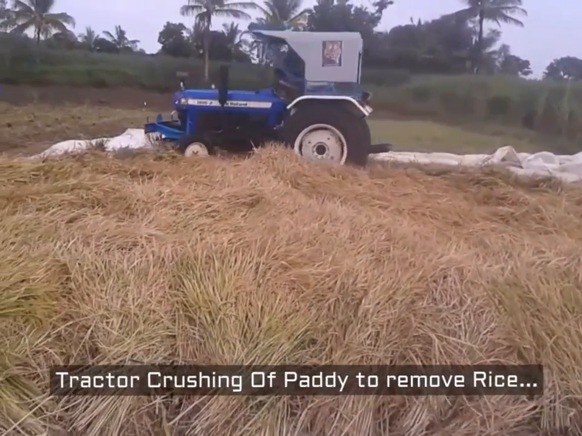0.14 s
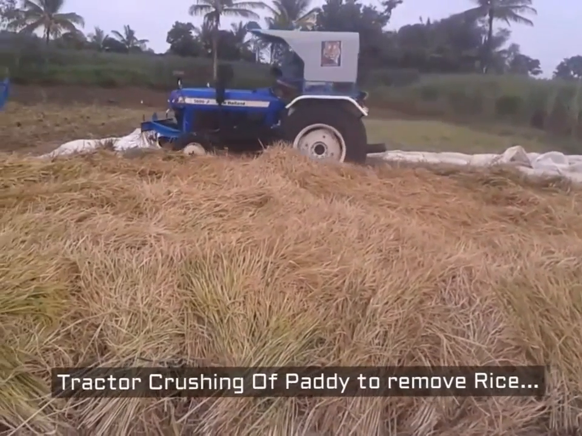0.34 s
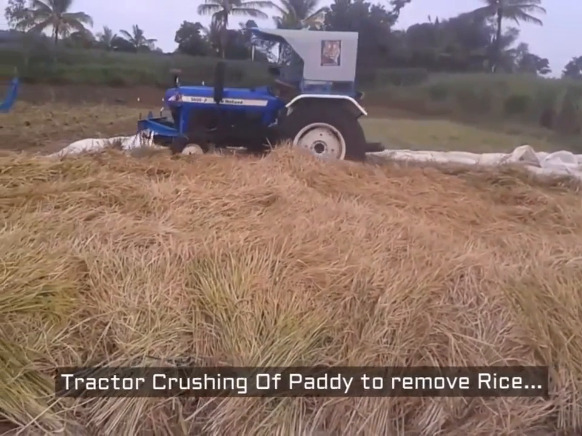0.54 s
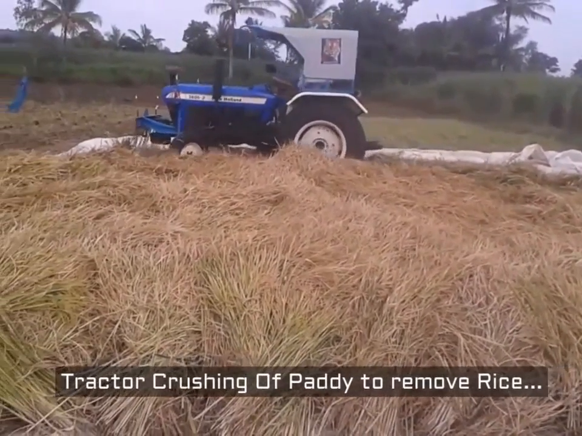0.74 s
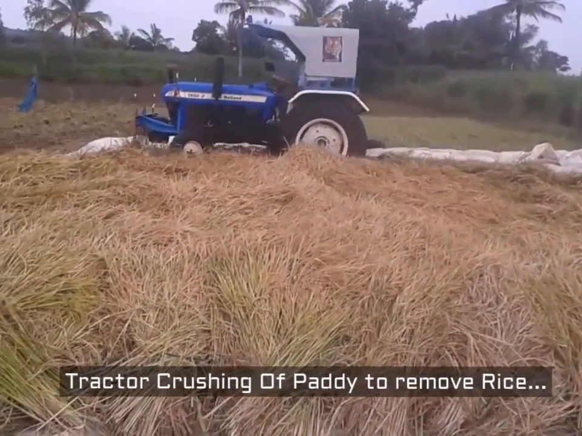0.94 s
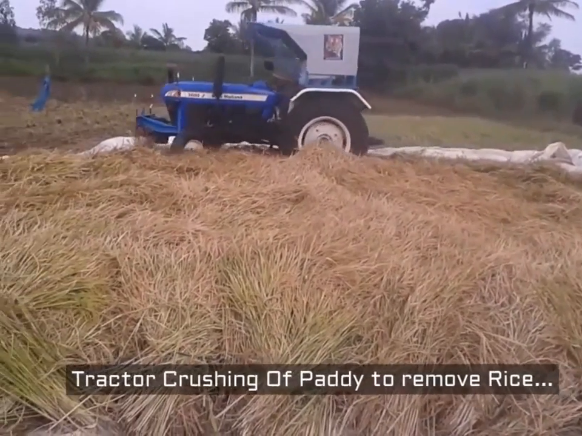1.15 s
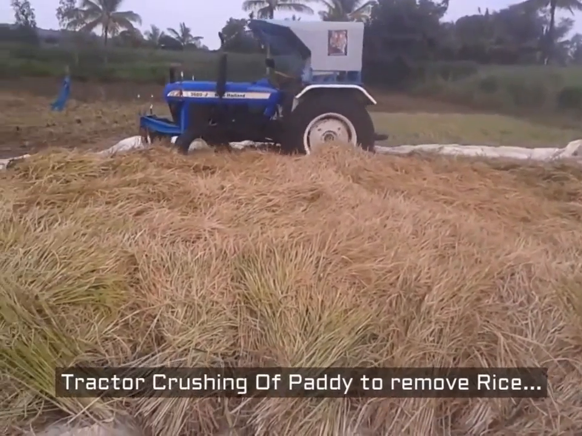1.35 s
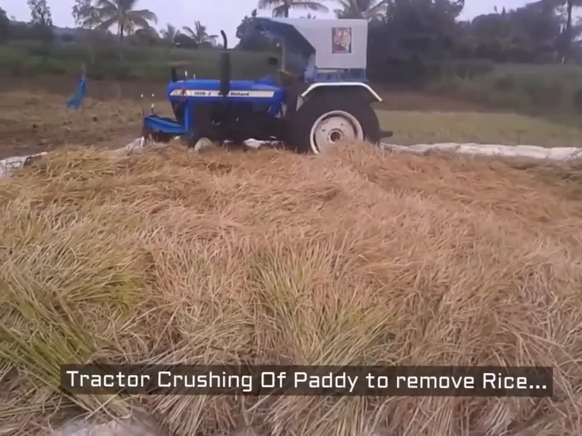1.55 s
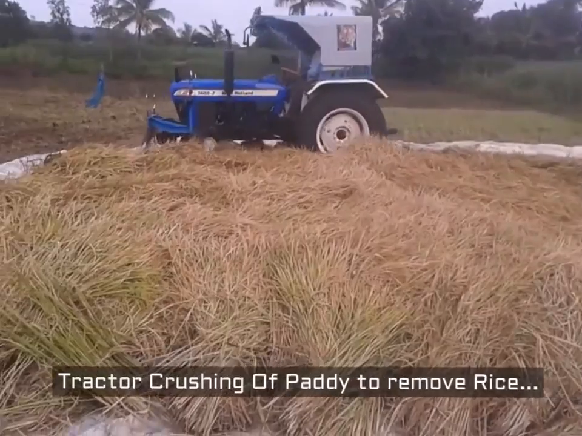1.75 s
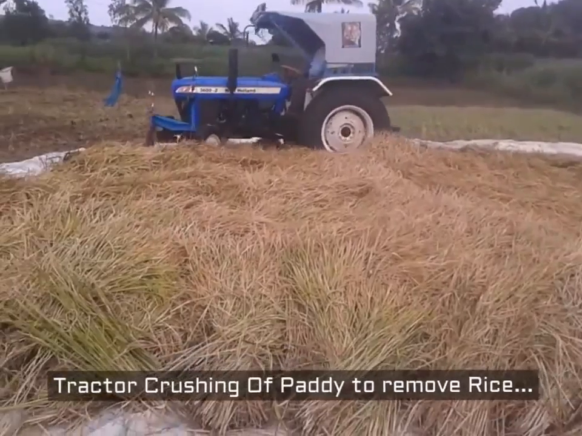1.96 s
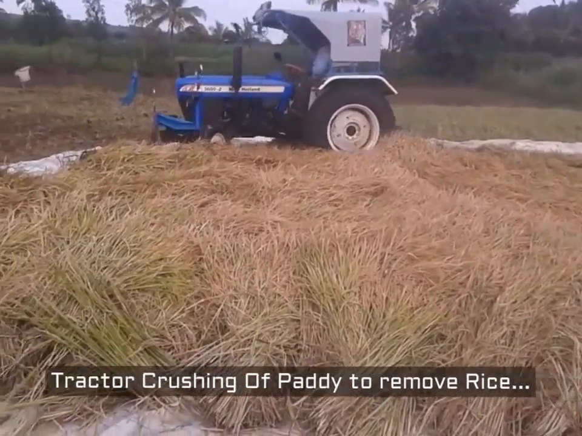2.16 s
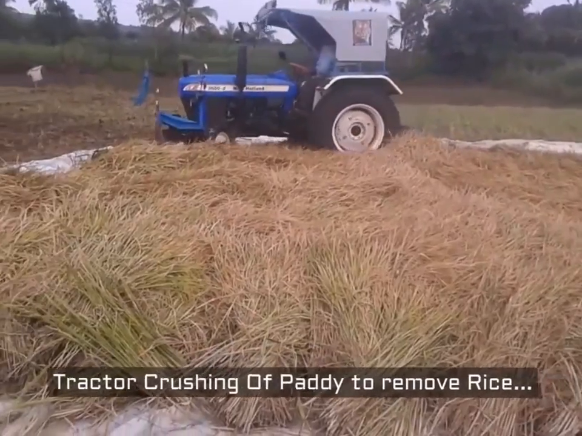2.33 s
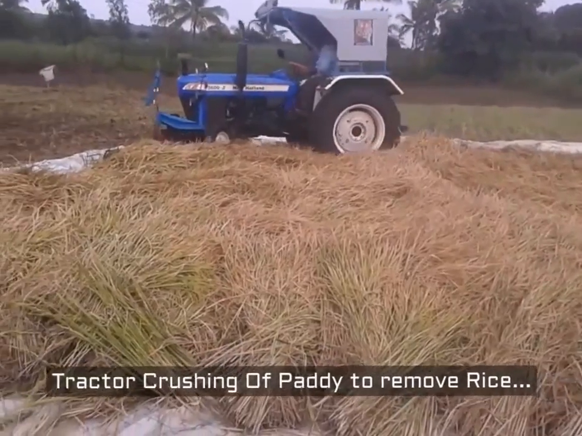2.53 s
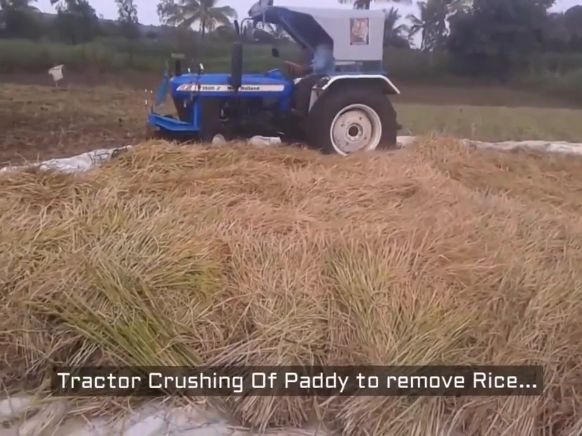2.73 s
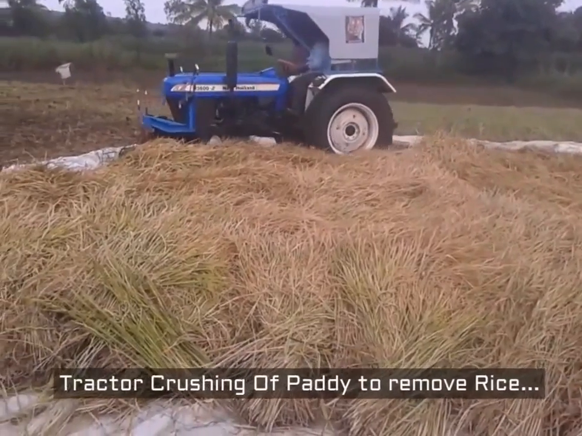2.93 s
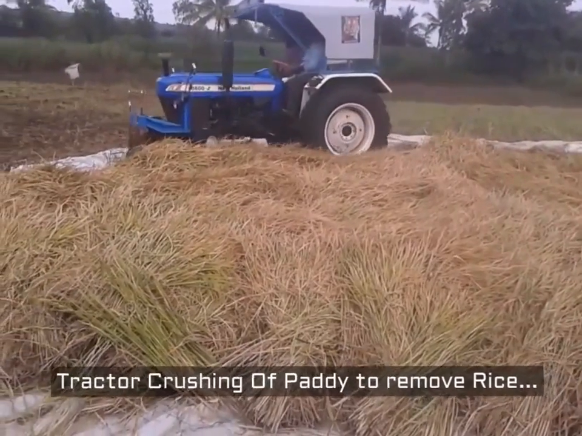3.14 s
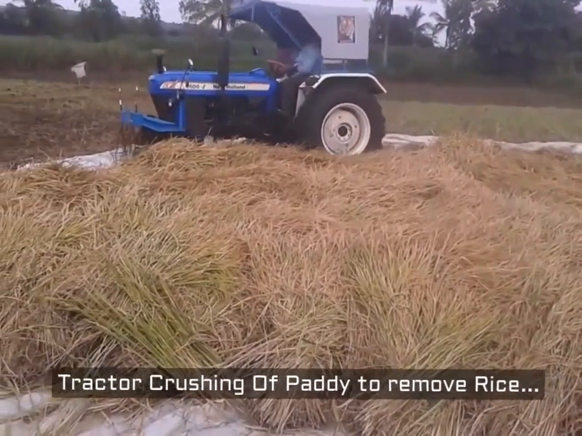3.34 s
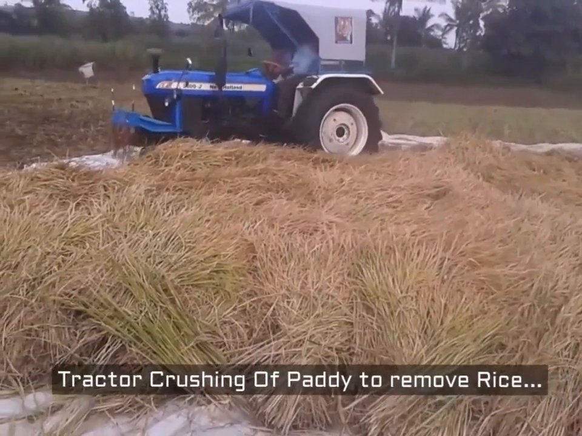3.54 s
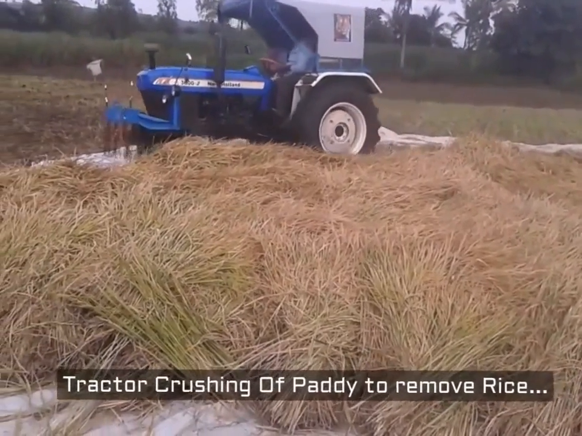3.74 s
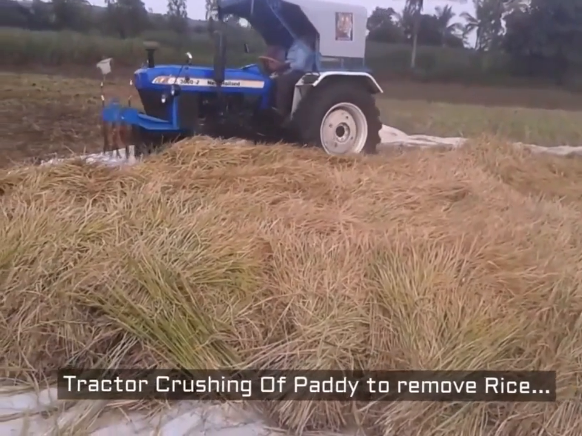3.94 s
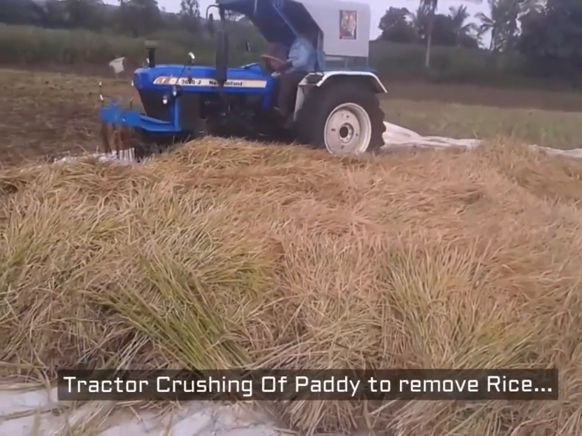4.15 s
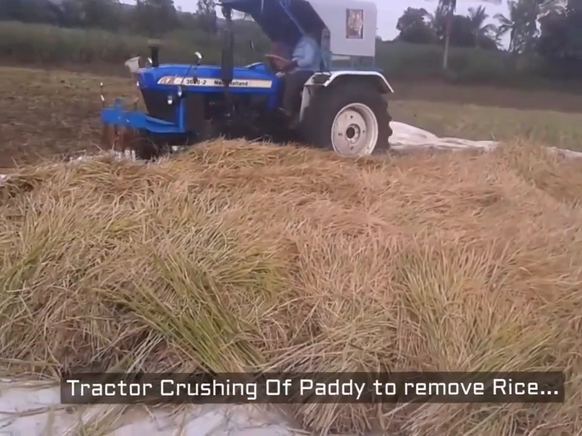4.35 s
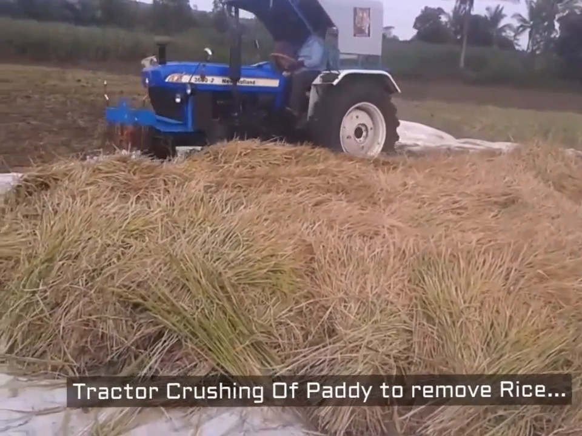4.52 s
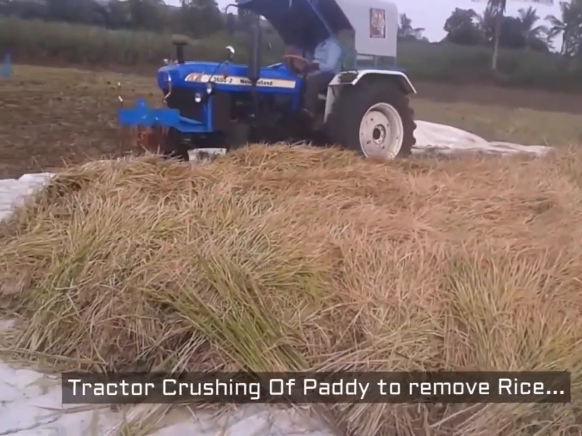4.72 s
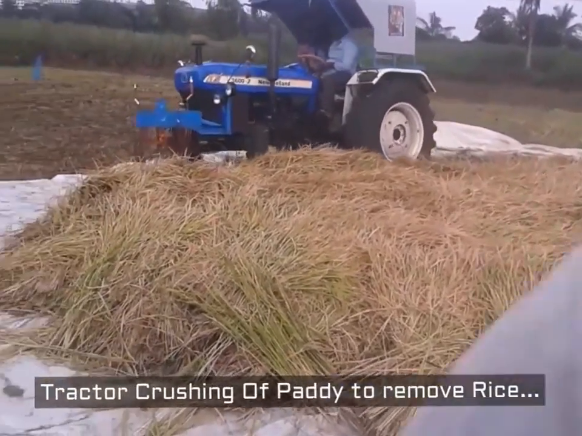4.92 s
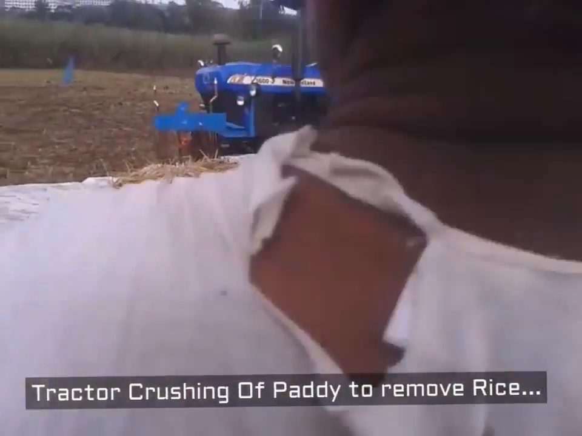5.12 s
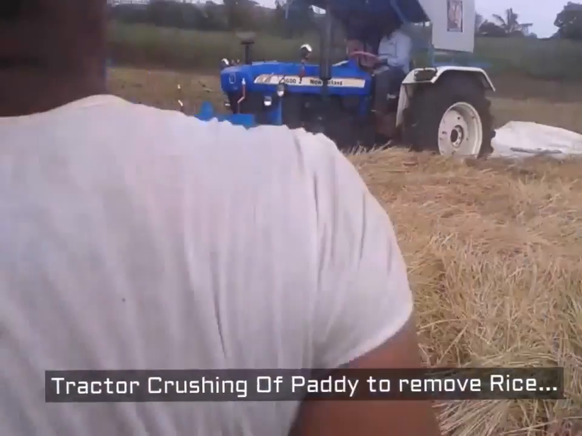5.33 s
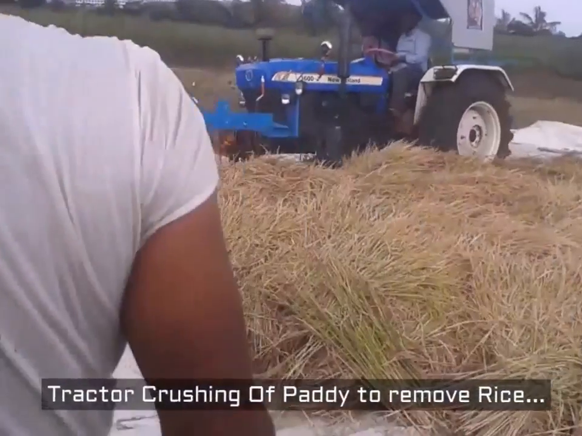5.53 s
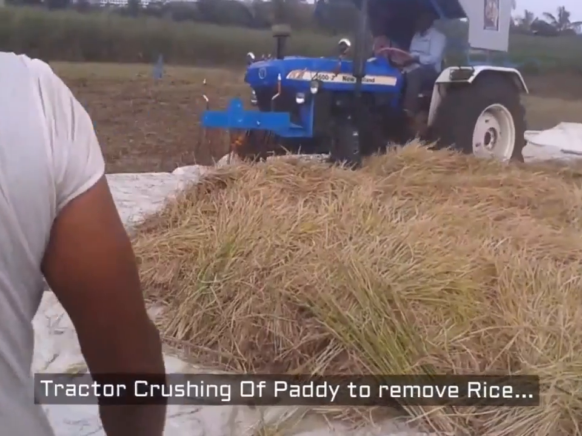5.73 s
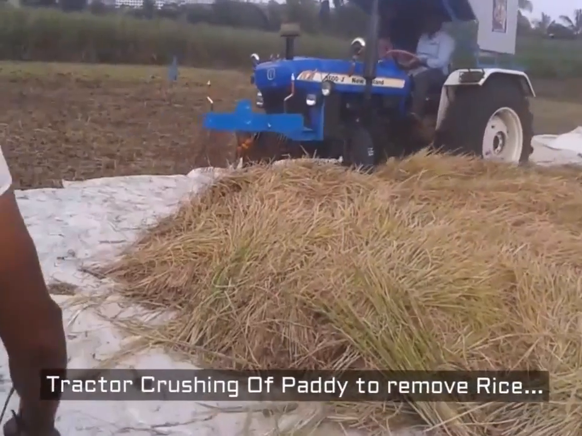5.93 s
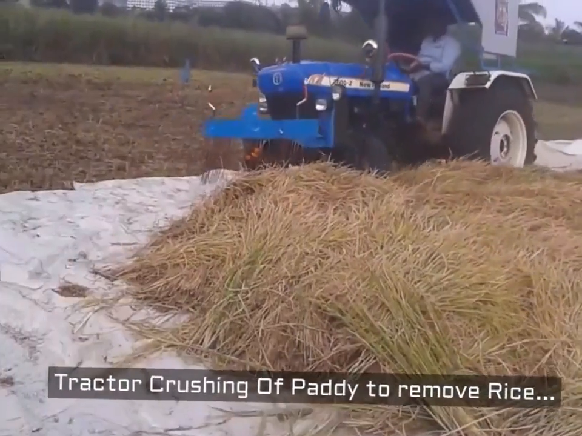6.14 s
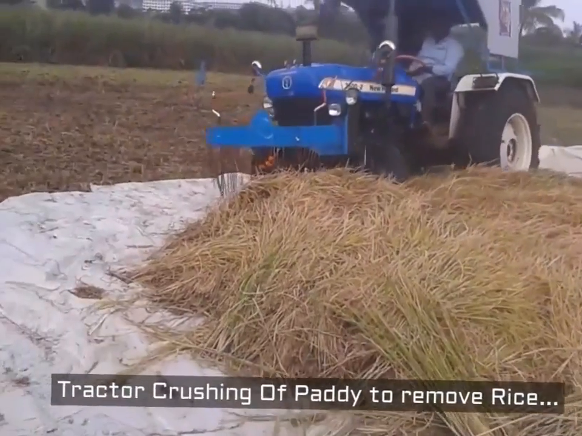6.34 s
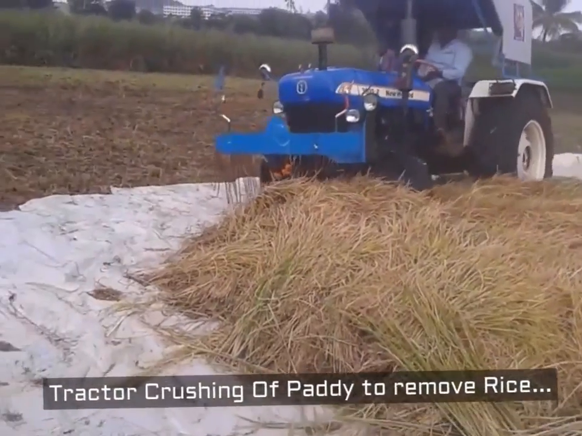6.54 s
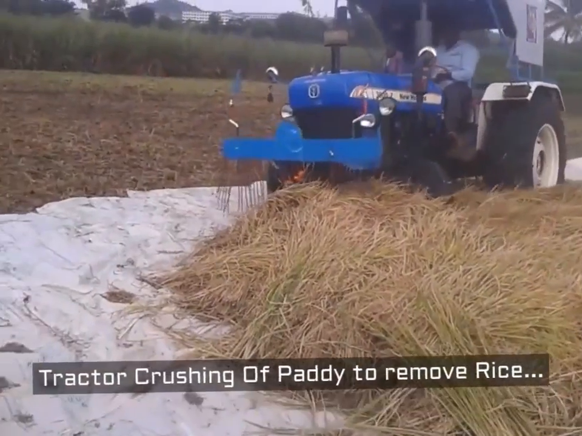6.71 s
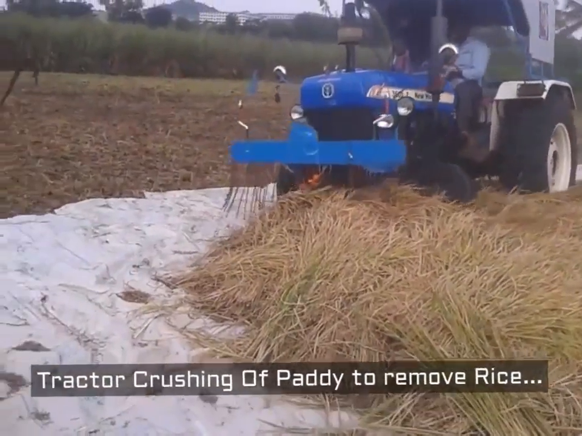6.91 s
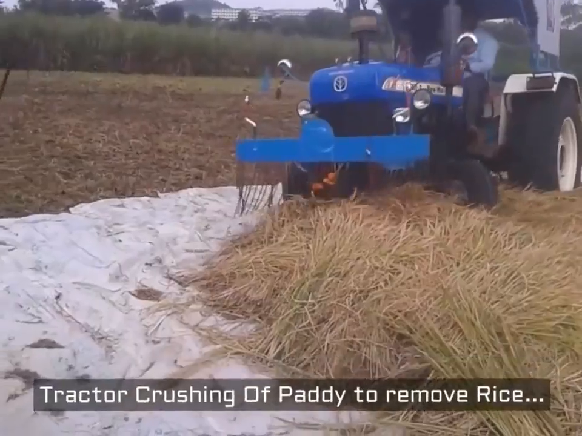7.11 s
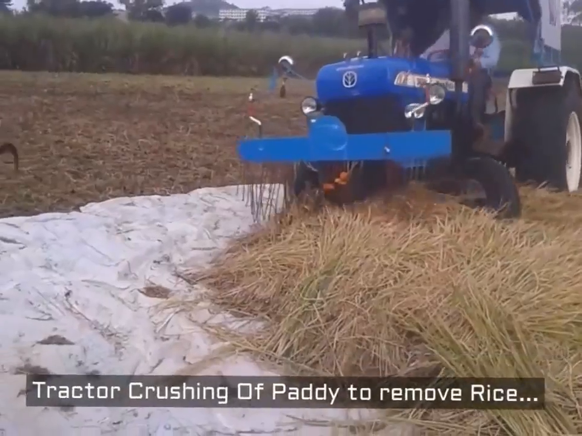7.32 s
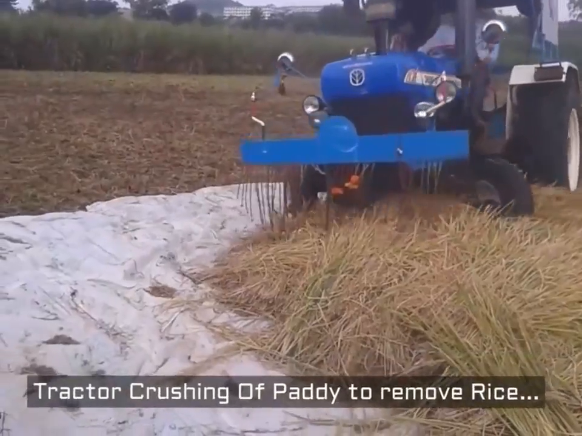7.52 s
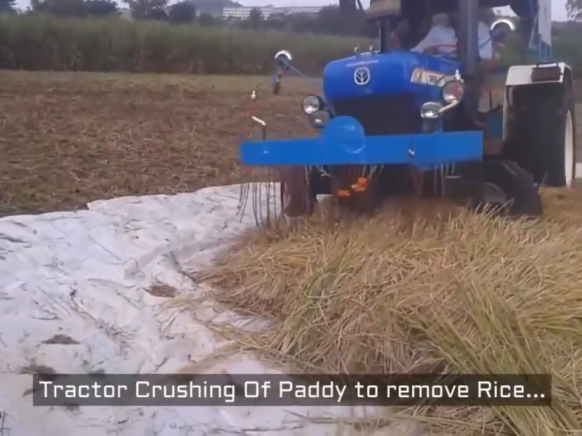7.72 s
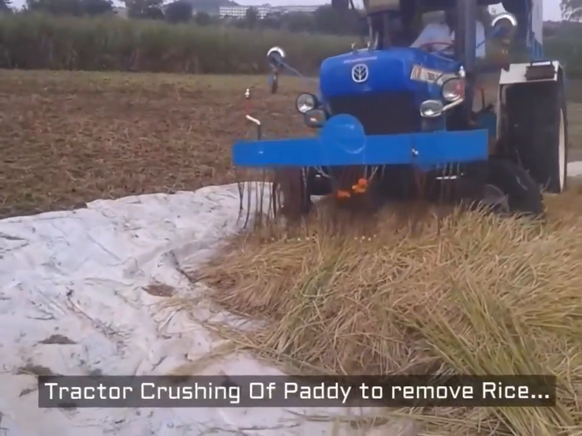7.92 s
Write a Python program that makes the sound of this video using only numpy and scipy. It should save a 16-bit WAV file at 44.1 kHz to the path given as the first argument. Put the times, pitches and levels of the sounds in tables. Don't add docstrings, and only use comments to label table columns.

```python
import sys
import numpy as np
from scipy import signal
from scipy.fft import rfft, irfft, next_fast_len
from scipy.io import wavfile
from scipy.ndimage import uniform_filter1d

SR = 44100
rng = np.random.default_rng(int(sys.argv[2]) if len(sys.argv) > 2 else 0)


def wav_record(signal):
    frames = np.transpose(np.atleast_2d(signal))
    bounded = np.clip(frames, -1, 1)
    quanta = np.round(bounded * 32767).astype(np.int16)
    wavfile.write(sys.argv[1], SR, quanta)


def undo_db(level):
    steps = np.asarray(level, float) / 20
    return 10 ** steps


N = 351477


def rms_one(x):
    return x / np.sqrt(np.mean(x ** 2) + 1e-20)


def in_time(rows):
    s, *columns = np.transpose(rows)
    return [np.interp(np.arange(N) / SR, s, c) for c in columns]


def evened(x, span_s=0.3):
    return x / np.sqrt(uniform_filter1d(x ** 2, int(span_s * SR)) + 1e-12)


def coloured(x, spectrum):
    size = next_fast_len(N)
    hz, db = np.transpose(spectrum)
    grid = np.maximum(np.arange(size // 2 + 1) * SR / size, 1)
    gain = undo_db(np.interp(np.log(grid), np.log(hz), db))
    return rms_one(irfft(rfft(x, size) * gain, size)[:N])


def resonate(x, hz, width_hz):
    r = np.exp(-np.pi * width_hz / SR)
    top = (1 - r * r) / 2
    return signal.lfilter([top, 0, -top], [1, -2 * r * np.cos(2 * np.pi * hz / SR), r * r], x)


def band(x, low_hz, high_hz):
    return evened(signal.sosfilt(signal.butter(3, [low_hz, high_hz], "band", fs=SR, output="sos"), x))


def passing(events):
    t = np.arange(N) / SR
    return sum(db * np.exp(-((t - s) / half_s) ** 2) for s, db, half_s in events)


def rattle(spread_db, size=N):
    return rms_one(rng.standard_normal(size) * undo_db(spread_db * np.minimum(rng.exponential(1, size), 4)))


def stroke(firings, start, rise, hold, fall):
    since = (firings - start) % 1
    shape = np.clip(since / rise, 0, 1) * np.exp(-np.maximum(since - hold, 0) / fall)
    return shape, np.floor(firings - start).astype(int) + 3


def contacts(number, habit, grain_db, change_s=1.08):
    began = np.maximum.accumulate(np.arange(N) * (np.diff(number, prepend=0) > 0))
    trains = rattle(grain_db, size=12 * 3 * 4000).reshape(12, 3, 4000)
    age = began / SR / change_s
    older, since = age.astype(int), np.arange(N) - began
    blend = age % 1 * np.pi / 2
    train = np.cos(blend) * trains[older, number % 3, since]
    train = train + np.sin(blend) * trains[older + 1, number % 3, since]
    return np.sqrt(habit) * train + np.sqrt(1 - habit) * rattle(grain_db)


def strikes(number, delays_s, loose_s):
    starts = np.flatnonzero(np.diff(number) > 0)
    late = np.array(delays_s) + loose_s * rng.random((200, len(delays_s)))[:len(starts)]
    out = np.zeros(N + 2000)
    out[starts[:, None] + (np.abs(late) * SR).astype(int)] = (-1.) ** np.arange(len(delays_s))
    return out[:N]


# (frequency [Hz], density [dB per Hz])
ROAR_SPECTRUM = [(320, -28.5), (550, -8), (666, -3.5), (1130, 2), (1590, -2), (1990, -2.5), (2080, 4.5),
                 (2340, -42), (3220, -7), (4290, -13), (5140, -6), (7000, -21), (9100, -73), (15400, -120)]


def roar(level_db):
    return undo_db(level_db - 4.5) * coloured(rng.standard_normal(N), ROAR_SPECTRUM)


# (frequency [Hz], density [dB per Hz])
HISS_SPECTRUM = [(3060, -21.5), (5200, -3.5), (6600, -6), (7890, -9.5), (15600, -19.5)]
# (time [s], gain [dB], half-length [s])
SWISHES = [
    (.2, 5.5, 0.12),
    (1.55, 2, 0.16),
    (3.1, 1, 0.11),
    (4.35, 11.5, 0.063),
    (5.61, 4, 0.027),
    (5.71, 11.5, 0.068),
    (7.35, 6, 0.54),
]


def straw():
    t = np.arange(N) / SR
    clumps_db = np.interp(t * 14, np.arange(120), 2.9 * rng.standard_normal(120))
    level_db = -40 + 0.8448 * t + passing(SWISHES)
    return undo_db(level_db - 0.5 + clumps_db) * coloured(rattle(spread_db=5.0), HISS_SPECTRUM)


def brush():
    hz, width_hz = 4400, 1800
    sweep = np.exp(-((np.arange(N) / SR - 5.67) / 0.12) ** 2)
    grains = resonate(resonate(rattle(spread_db=5.0), hz, width_hz), hz, 2 * width_hz)
    return undo_db(-21.5) * sweep * rms_one(grains)


# (time [s], speed [rpm])
SPEED = [(0, 785.1), (0.29, 830.4), (1.11, 699.8), (1.69, 767.4), (2.03, 877.1), (2.88, 805.9),
         (3.13, 844.4), (3.38, 921.3), (4.29, 798.9), (4.7, 872.7), (5.49, 823.2), (5.85, 880.0),
         (6.17, 858.8), (6.57, 911.2), (7.49, 777.5), (7.8, 792.9), (7.97, 774.5)]


def crank():
    firings_per_turn, first_firing = 1.5, .089
    return first_firing + np.cumsum(in_time(SPEED)[0]) * firings_per_turn / 60 / SR


# (time [s], gain [dB], held [s], harder knock [dB])
SURGES = [(.15, 3, 0.041, -5), (.6, 3.5, 0.09, -1.5), (1.398, 2.5, 0.033, 2.5), (1.78, 1.5, 0.24, -0.3),
          (2.29, 1, 0.3, -0.3), (2.56, -0.5, 0.36, 0.8), (2.959, 3.5, 0.24, 1.5), (3.57, 3.5, 0.047, -0.8),
          (3.85, 3.5, 0.13, -1), (4.21, 2, 0.19, 1.5), (4.6, 2, 0.28, 0.3), (5.07, 1, 0.033, 0.7),
          (5.41, 3, 0.26, .1), (5.63, 2, 0.15, 0.5), (5.86, 0.5, 0.3, 0), (6.24, 0.4, 0.079, -1.1),
          (7.0, 0.1, 0.4, 1.5)]


def surges():
    rise_s, fall_s = 0.01, 0.075
    s, db, held_s, hard_db = np.transpose(SURGES)[:, :, None]
    since = np.arange(0, N, 50) / SR - s
    shape = np.clip(since / rise_s, 0, 1) * np.exp(-np.clip(since - held_s, 0, None) / fall_s)
    return [np.repeat((c * shape).sum(0), 50)[:N] for c in (db, hard_db)]


# (time [s], difference of the cylinders [0-1.5], nose facing the microphone [0-1])
TURN = [(0, 1.1, 0.18), (.8, 0.84, 0.09), (1.55, 0.8, 0.23), (2.2, 0.14, 0.29), (3, 0.53, 0.27),
        (3.8, 0, 0.23), (4.6, 0.45, 0.68), (5.3, 0.43, 0.57), (5.8, 0.52, 0.47), (6.8, 0.9, 0.69),
        (7.3, 0.8, 0.78), (7.97, 1, 1.0)]


def struck(modes, shape, number, hits, habit, vary_db, mode_vary_db, grain_db, between_db):
    chance = rng.standard_normal((200, len(modes) + 1))
    shaking = contacts(number, habit, grain_db)
    unevenness, facing = in_time(TURN)
    out = np.zeros(N)
    for k, (hz, width_hz, nose_db, *by_cylinder) in enumerate(modes):
        mean_db = np.mean(by_cylinder)
        own_db = unevenness * (np.array(by_cylinder)[number % 3] - mean_db)
        strength = undo_db(own_db + vary_db * chance[number, -1] + mode_vary_db * chance[number, k])
        force = strength * (shape * shaking + hits) + undo_db(between_db) * shaking
        ring = resonate(force * undo_db(mean_db + nose_db * facing), hz, width_hz)
        out += (-1) ** k * ring / np.sqrt(width_hz)
    return out


# (frequency [Hz], width [Hz], gain nose-on [dB], cylinder 1, 2, 3 [dB])
PIPE = [(186, 30, -12.5, -18, -12.5, -18.5), (299.5, 55, 2, -10.5, -17.5, -3.5), (392, 50, 3, -6, -15, 2.5),
        (464, 63.5, -1.5, 1.5, 3.5, -4), (504, 52, 3, -4, -4.5, -4), (550.4, 39, 1, -2.5, -4.5, -9.5)]
# (frequency [Hz], density [dB per Hz])
THUMP_SPECTRUM = [(12, -69), (20, -30), (135, -17.5), (184, -11), (245, -41), (307, -0.5), (403, -0.5),
                  (445, 0.5), (600, -10), (780, -63), (1320, -120)]


def exhaust(firings, level_db):
    shape, number = stroke(firings, start=0.1003, rise=0.038, hold=0.1, fall=0.38)
    hits = undo_db(29) * strikes(number, [.003, .024], loose_s=.0002)
    puffs = struck(PIPE, shape, number, hits, habit=.9, vary_db=1.2, mode_vary_db=1.2,
                   grain_db=1.5, between_db=-1.5)
    beat, number = stroke(firings, start=0.85, rise=0.091, hold=0.79, fall=0.19)
    lump_db = np.clip(6 * rng.standard_normal(200), -14, 5)
    lumps = beat * undo_db(lump_db)[number // 2] + .05
    body = coloured(contacts(number, habit=0.65, grain_db=8.0) * lumps, THUMP_SPECTRUM)
    return undo_db(level_db - 2.2) * band(puffs, low_hz=167, high_hz=600) + undo_db(level_db - 7.0) * body


# (frequency [Hz], width [Hz], gain nose-on [dB], cylinder 1, 2, 3 [dB])
COVERS = [(839, 76, 10.5, -12, -13, -7), (928, 127, 7, 0, 1, -19), (1144, 95, -1.5, 8, -1.5, -3),
          (1265, 87, 6, 9, -7, -5.5), (1460, 157, 3.5, 2.5, -0.5, 2.5), (1750, 132, 1, 2, 1.5, 1),
          (1910, 66, 3.5, 1, 3, 1), (2040, 140, 0, -0.5, 8, 7), (2800, 670, 6, 1, 2.5, -5)]


def clack(firings, level_db):
    shape, number = stroke(firings, start=.16, rise=0.02, hold=0.049, fall=0.48)
    hits = undo_db(22) * strikes(number, [.002, .0075], loose_s=.001)
    covers = struck(COVERS, shape, number, hits, habit=.8, vary_db=1.0, mode_vary_db=1.8,
                    grain_db=1.6, between_db=-10.5)
    return undo_db(level_db - 2.5) * band(covers, low_hz=707, high_hz=2730)


# (frequency [Hz], width [Hz], gain nose-on [dB], cylinder 1, 2, 3 [dB])
BLOCK = [(1750, 210, 5, 7, 4.5, 0.5), (2780, 950, 2.5, 0.5, 9, 6), (3240, 106, 8, -4.5, 4, -2),
         (3502, 190, 6, 0, 0, 1.5), (4085, 370, 14, -1, -1, -2), (4538, 154, 11.5, -2, 3, -5.5),
         (4840, 43, 5, -3, 0, -4), (5190, 140, 2.5, -1.5, 2, 7.5), (5460, 270, 7, 8, -1, -14),
         (5840, 240, -20, 13, 7, 0.5), (7500, 1360, 2, -6, 13.5, -2.5)]


def knock(firings, level_db):
    shape, number = stroke(firings, start=.8, rise=0.023, hold=0.11, fall=0.29)
    hits = undo_db(23) * strikes(number, [.002, .0065], loose_s=.0015)
    block = struck(BLOCK, shape, number, hits, habit=0.7, vary_db=1.0, mode_vary_db=2.5,
                   grain_db=1.5, between_db=-7.5)
    puff, number = stroke(firings, start=0.758, rise=0.13, hold=0.18, fall=0.18)
    by_firing = undo_db(2.2 * rng.standard_normal(200))[number]
    hiss = coloured(rattle(spread_db=1.0) * puff * by_firing, HISS_SPECTRUM)
    return undo_db(level_db - 2.5) * band(block, low_hz=1300, high_hz=6000) + undo_db(level_db - 11.0) * hiss


def rings(spans, firings, start, width_hz, level_db):
    fade_s = 0.19
    t, out = np.arange(N) / SR, np.zeros(N)
    shape, number = stroke(firings, start, rise=0.021, hold=0.041, fall=0.044)
    for from_s, to_s, hz, db in spans:
        burst = shape * undo_db(1.8 * rng.standard_normal(200))[number] * rng.standard_normal(N)
        seen = np.clip(np.minimum(t - from_s, to_s - t) / fade_s, 0, 1)
        out += undo_db(db) * seen * rms_one(resonate(resonate(burst, hz, 2 * width_hz), hz, width_hz))
    return undo_db(level_db) * out


# (from [s], to [s], frequency [Hz], level over the layer [dB])
KNOCK_RINGS = [
    (2.9, 4.9, 3250, -9.5),
    (3.35, 4.75, 5230, -14),
    (5.8, 6.7, 4560, -10),
    (5.9, 6.5, 3640, -10),
    (6.9, 7.6, 3410, -10),
]
CLACK_RINGS = [
    (1.75, 3.3, 1975, -9.5),
    (3.4, 5.15, 2050, -8.5),
    (5.45, 6.9, 2023, -13.5),
]


def panels(firings, knock_db, clack_db):
    return rings(KNOCK_RINGS, firings, .81, 126, knock_db) + rings(CLACK_RINGS, firings, 0.184, 80, clack_db)


def hard_blows(events, burst_s, width_hz, gain_db):
    out, t = np.zeros(N + 2000), np.arange(2000) / SR
    envelope = np.exp(-t / burst_s) * (1 - np.exp(-t / 0.0011))
    bursts = rng.standard_normal((len(events), 2000)) * envelope
    for (s, db, hz), burst in zip(events, bursts):
        ring = resonate(resonate(burst, hz, 3 * width_hz), hz, width_hz)
        out[int(s * SR):int(s * SR) + 2000] += undo_db(db + gain_db) * ring / np.abs(ring).max()
    return out[:N]


# (time [s], peak level [dB], ring [Hz])
HARD_KNOCKS = [(1.404, -21, 3320), (3.1078, -4, 3290), (3.2926, -8.5, 3230), (3.9234, -5, 3260),
               (3.9724, -5, 3200), (4.022, -9, 4470), (4.0667, -9, 3210), (4.2124, -5, 3320),
               (4.4598, -5.5, 4650), (4.5565, -6.5, 3870), (4.6034, -5, 3430), (4.6488, -2.5, 5430),
               (4.7865, -10, 3480), (5.4964, -5, 3300), (5.8716, 1, 4520), (5.916, 0.5, 4470),
               (5.9638, -5, 4450), (6.0556, -6, 3720), (6.241, -6.5, 3610), (6.287, -15, 3610),
               (6.378, -1, 4570), (6.4218, -5, 4700), (7.009, -1.5, 3440), (7.0584, -4, 3500),
               (7.154, -4, 3470), (7.204, -7, 3400), (7.3002, -9, 3360), (7.3517, -6, 4120),
               (7.454, -11, 4400), (7.707, -2, 4040)]
HARD_CLACKS = [(0.154, -4.5, 1260), (0.7577, -9, 1240), (0.9204, -5, 1300), (1.088, -9, 1360),
               (1.258, -9, 1230), (1.424, -16, 1340), (1.7888, -6, 1750), (1.9335, -0.5, 1840),
               (2.0737, 0, 1940), (2.2109, -3, 1880), (2.303, -7, 1750), (2.3513, -2.5, 1910),
               (2.4949, -3, 2040), (2.589, -6.5, 1440), (3.03, -2.5, 1450), (3.1568, 0, 1850),
               (3.8487, -10, 1990), (4.1846, -3, 1980), (4.4303, -1, 2030), (4.6019, -7, 1940),
               (4.7133, -1.5, 1210), (4.803, -1, 2090), (5.0903, -3, 2000), (5.5129, -1, 2060),
               (5.6446, -9, 2030), (6.5283, -3, 1250), (6.6633, -6, 1270), (6.7988, 0.5, 1290),
               (6.9361, -5, 1340), (7.5223, -8, 1210)]


def hard_firings():
    return hard_blows(HARD_KNOCKS, 0.0033, 240, -5.5) + hard_blows(HARD_CLACKS, 0.0044, 290, -5.5)


# (time [s], loss above the corner [dB], half-length [s])
SHADOWS = [
    (2.76, 4, 0.02),
    (5.29, 6, 0.03),
]


def shadowed(field, close):
    dull = signal.sosfilt(signal.butter(2, 2500, fs=SR, output="sos"), field)
    heard = field + close
    shade = 1 - undo_db(-passing(SHADOWS))
    return heard + shade * (dull - heard)


# (time [s], level [dB])
APPROACH = [(0, -21), (.45, -24), (1.3, -23.5), (1.7, -23.5), (2.1, -21), (2.85, -22.5), (3.5, -22.5),
            (4.15, -21.5), (4.5, -20), (5.0, -23.5), (5.4, -23.5), (6.1, -19), (6.8, -18), (7.4, -18.5),
            (7.97, -20)]


def scene():
    firings = crank()
    near_db, (surge_db, hard_db), facing = in_time(APPROACH)[0], surges(), in_time(TURN)[1]
    clack_db = near_db + surge_db
    knock_db = near_db - 6.5 + 5.5 * facing + 1.52 * surge_db + hard_db
    exhaust_db = near_db - 13.5 + 6 * facing + 0.96 * surge_db
    roar_db = clack_db - 6 * (1 - facing)

    engine = exhaust(firings, exhaust_db) + clack(firings, clack_db) + knock(firings, knock_db)
    engine = engine + panels(firings, knock_db, clack_db) + hard_firings()
    engine = engine - 0.49 * resonate(engine, hz=2290, width_hz=410)
    field = roar(roar_db) + straw() + engine
    field = field - 0.53 * (1 - facing) * resonate(field, hz=656, width_hz=35)
    return shadowed(field, brush())[None]


def low_pass(x):
    return signal.sosfilt(signal.butter(12, 15700, fs=SR, output="sos"), x)


def record(dry):
    rounded = 1.2 * np.tanh(dry / 1.2)
    cut = signal.sosfilt(signal.cheby2(12, 60, 16000, fs=SR, output="sos"), rounded)
    return low_pass(cut)


dry = scene()
out = record(dry)
wav_record(out)
```